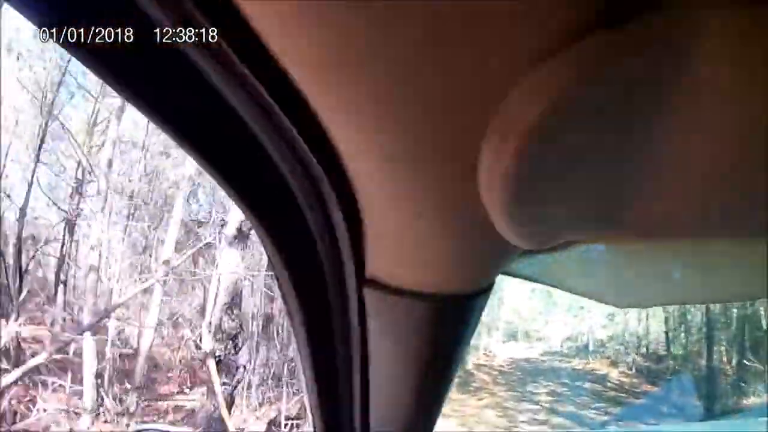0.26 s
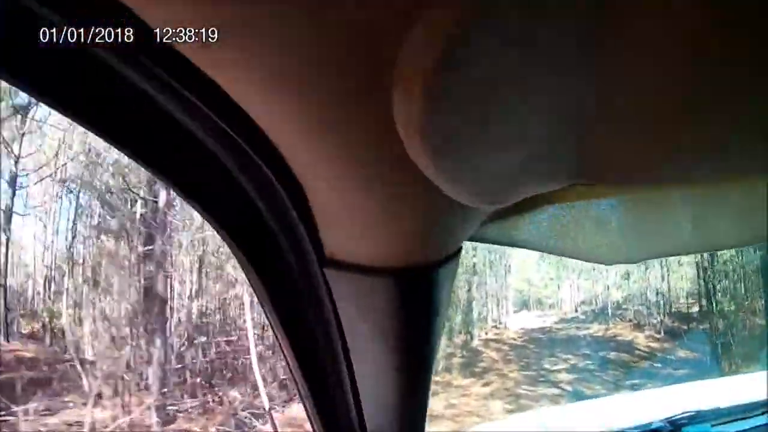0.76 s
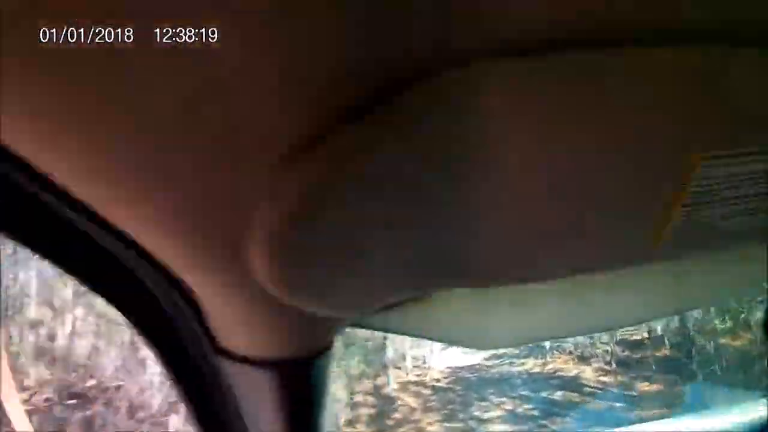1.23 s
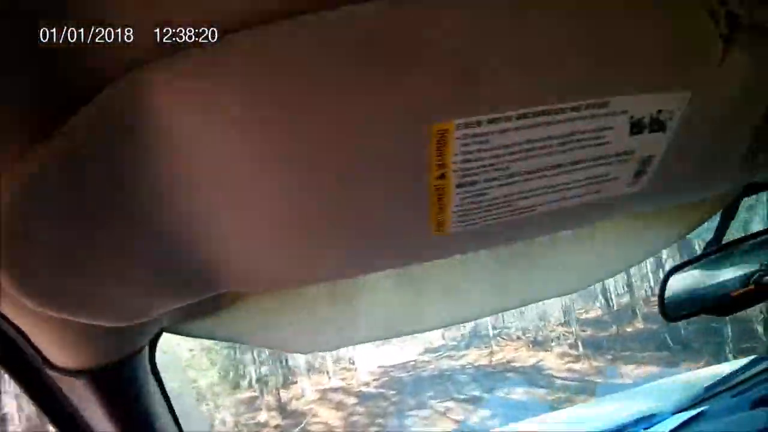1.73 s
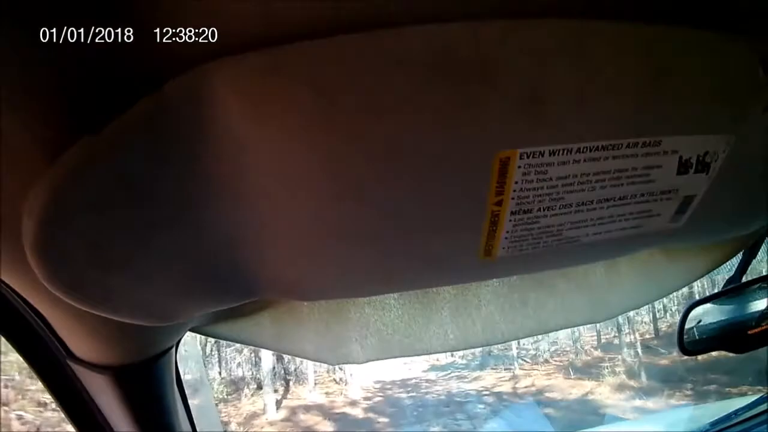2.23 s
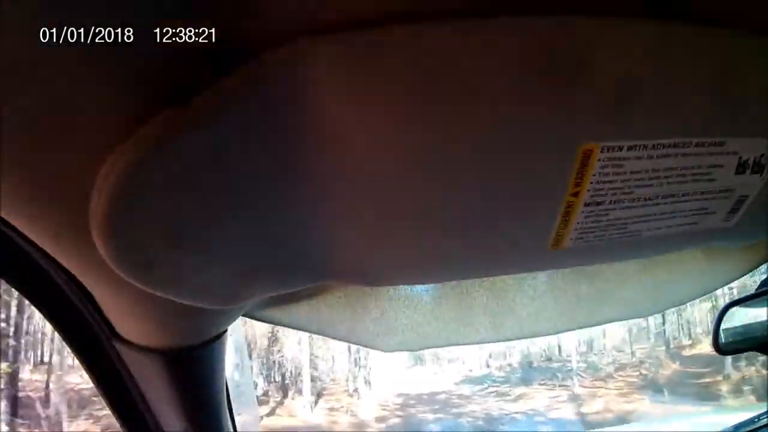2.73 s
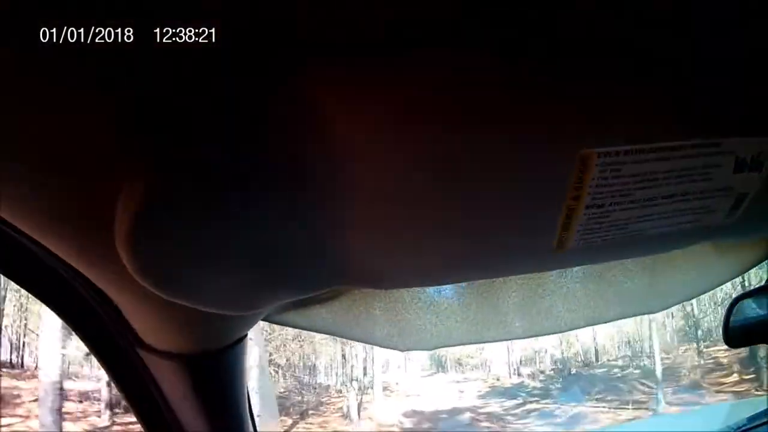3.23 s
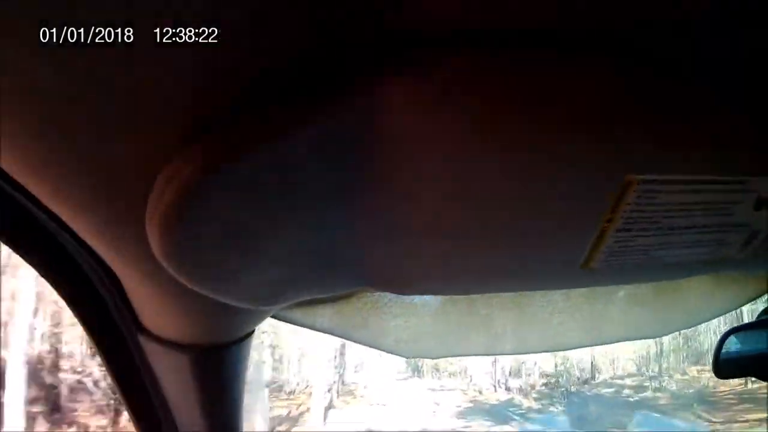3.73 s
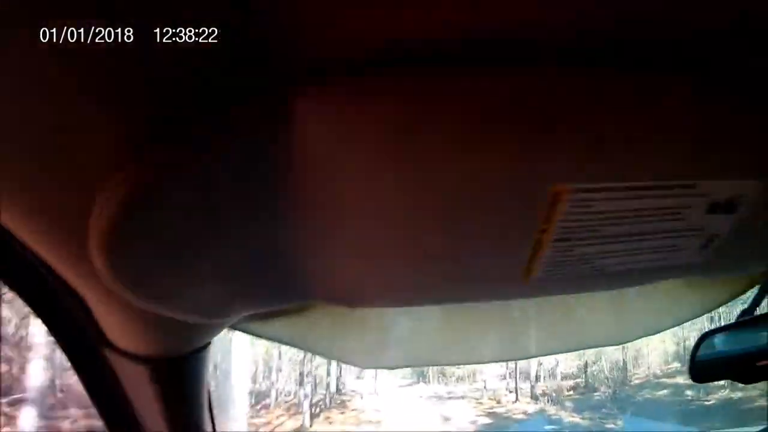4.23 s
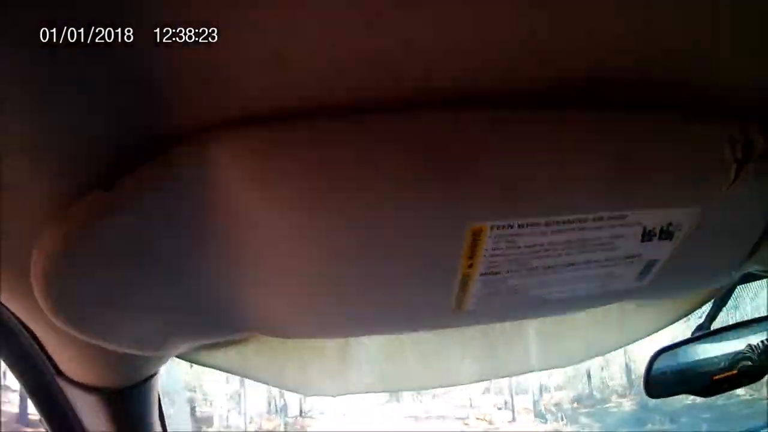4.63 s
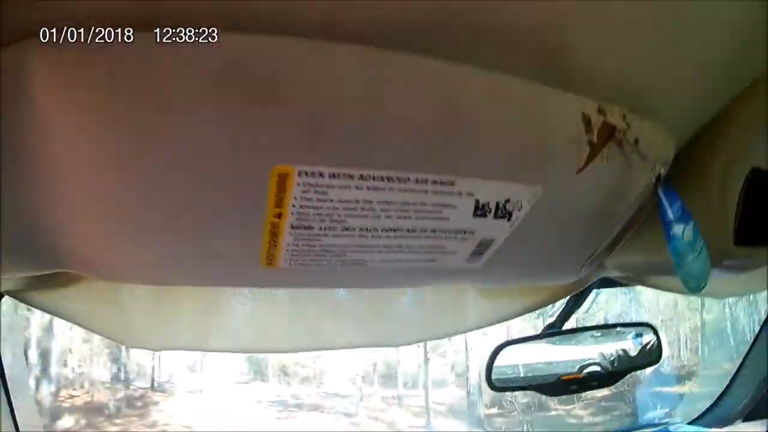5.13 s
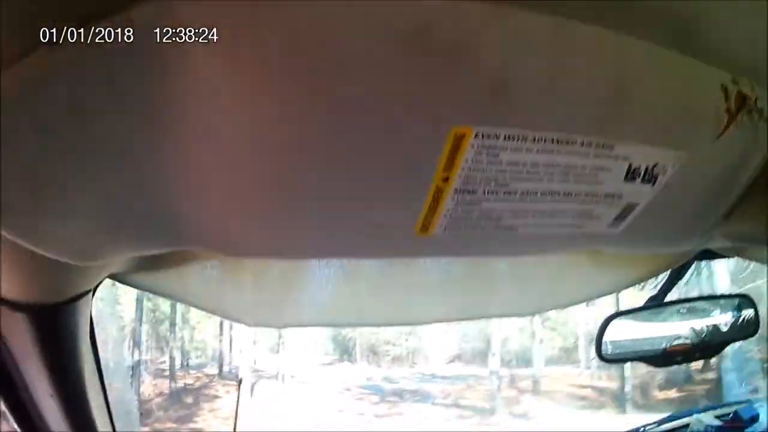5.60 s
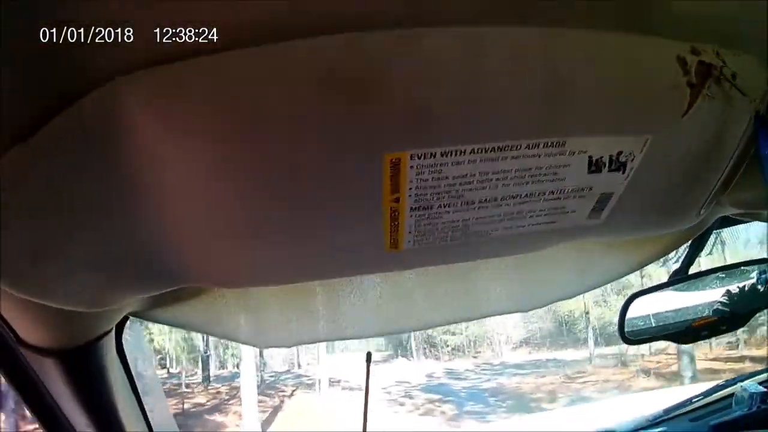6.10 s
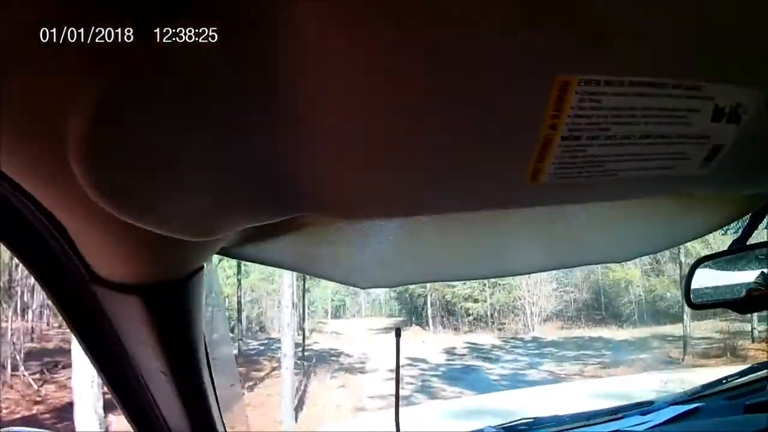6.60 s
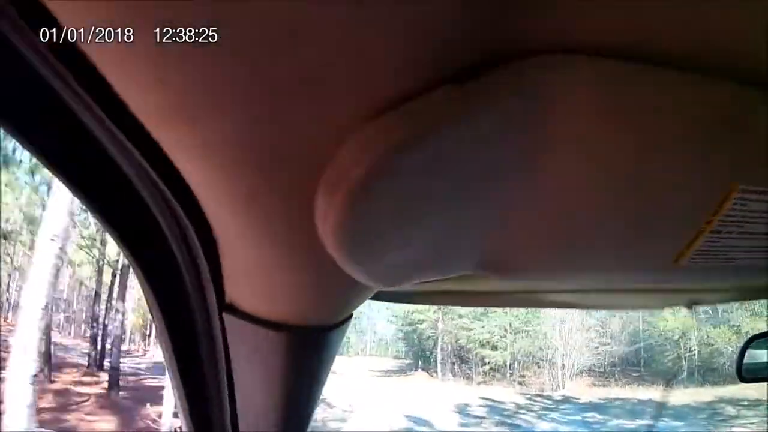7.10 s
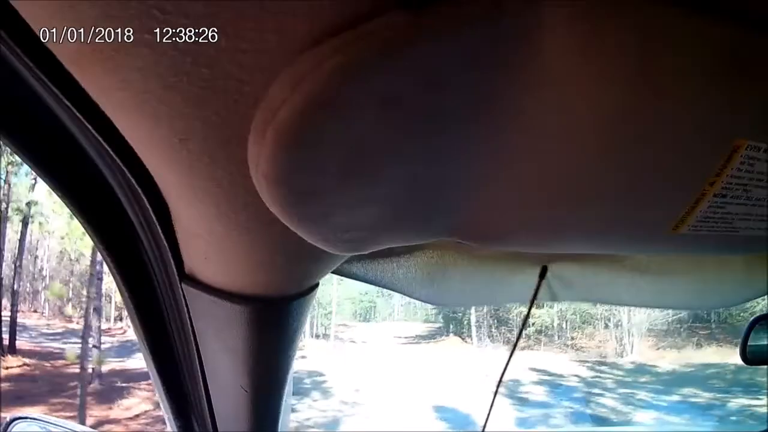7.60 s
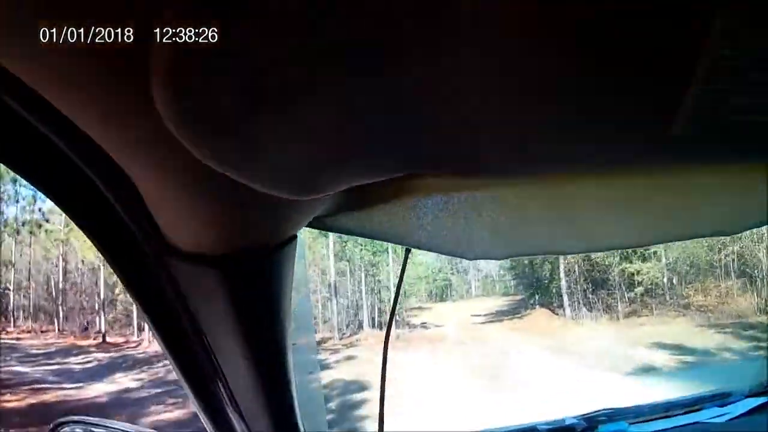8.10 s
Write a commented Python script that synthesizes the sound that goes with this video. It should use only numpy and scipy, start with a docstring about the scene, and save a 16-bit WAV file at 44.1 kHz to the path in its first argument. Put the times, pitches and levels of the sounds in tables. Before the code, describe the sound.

A truck drives slowly along a bumpy dirt road, heard from inside the cab. A deep, uneven exhaust drone runs throughout over low road rumble, light engine clatter, faint tyre grit and a barely audible brush of twigs. The engine pitch rises until about 2 seconds, then settles by 3. Small trim squeaks come around 2 and 3.8 seconds, along with soft, very low bumps. Loose trim begins knocking at about 4 seconds, and the bumps come closer together from 5. From about 6.3 seconds the driver lifts off and the engine sags to a lower, booming burble. Short floor thumps land between 6 and 8 seconds, strongest around 6.5, 7.1 and 7.5, amid busy hollow knocks and rattles. At about 8 seconds a half-second scrape passes under the body as the engine keeps running low.

```python
"""An eight-cylinder truck's exhaust drones through the cab as it creeps along a bumpy dirt road.
Two banks fire unevenly into their pipes; the note sags and booms when the driver lifts off.
Bumps thud through the springs and floor, loose trim knocks, rattles and squeaks, valve gear clatters.
Behind it sit road rumble, tyre grit, twigs brushing the body and one long scrape underneath."""
import sys
import numpy as np
from scipy import signal
from scipy.fft import rfft, irfft
from scipy.io import wavfile
from scipy.ndimage import uniform_filter1d

SR = 44100
rng = np.random.default_rng(int(sys.argv[2]) if len(sys.argv) > 2 else 0)


def unload_audio(sound):
    """Save the sound as a 16-bit wav file, at the path given as the first command line argument."""
    columns = np.transpose(np.atleast_2d(sound))
    # keep every value between -1 and 1, then stretch to whole-number steps
    steps = np.round(np.clip(columns, -1, 1) * 32767)
    wavfile.write(sys.argv[1], SR, steps.astype(np.int16))


N = 368235
TIME_S = np.arange(N) / SR


def gain_of(db):
    """Decibels to amplitude."""
    return 10 ** (np.asarray(db) / 20)


def unit_rms(x):
    """Normalises to an rms of one."""
    return x / np.sqrt(np.mean(x ** 2) + 1e-20)


def eq_db(curve, hz):
    """Reads an EQ curve on a log frequency axis."""
    freq_hz, level_db = np.transpose(curve)
    return np.interp(np.log(hz + 1), np.log(freq_hz + 1), level_db)


def automation(points):
    """Joins timed breakpoints into one value per sample."""
    return np.interp(TIME_S, *np.transpose(points))


def drift(size):
    """Random modulation of unit rms, smooth over size samples."""
    return unit_rms(uniform_filter1d(uniform_filter1d(rng.standard_normal(N), size), size))


def noise(curve, size, patchy_db):
    """Unit-rms noise within an EQ curve's band, with random patches in time and frequency."""
    hz = np.fft.rfftfreq(size, 1 / SR)
    real, imag, patches = rng.standard_normal((4 * N // size + 5, len(hz), 3)).T
    patches = unit_rms(uniform_filter1d(uniform_filter1d(patches, size=8, axis=0), size=6, axis=1))
    in_band = (hz >= curve[0][0]) & (hz <= curve[-1][0])
    spectrum = (real + 1j * imag) * gain_of(eq_db(curve, hz)[:, None] + patchy_db * patches)
    return unit_rms(signal.istft(spectrum * in_band[:, None], nperseg=size, noverlap=3 * size // 4)[1][:N])


def swells(rows):
    """Smooth rises and falls, one per row of start_s, length_s, peak_db."""
    return sum(gain_of(db) * np.sin(np.pi * np.clip((TIME_S - start_s) / length_s, 0, 1)) ** 2
               for start_s, length_s, db in rows)


# Tone of the twig swish: freq_hz, relative_db
TWIG_EQ = [(2900, -11), (3300, -5), (3900, -1.5), (4400, -6), (4900, -2.5), (5800, -4.5), (6200, -28.5)]
# Twigs brushing past: start_s, length_s, peak_db
TWIG_STROKES = [(.6, 0.8, -82.5), (2.1, 0.42, -76), (2.45, 0.76, -77), (6.55, 1.03, -77)]

def twigs():
    """Twigs drag along the body, swelling out of a faint constant swish."""
    level = (gain_of(-76) + swells(TWIG_STROKES)) * gain_of(1.3 * drift(size=600))
    return level * noise(TWIG_EQ, size=1024, patchy_db=4.5)


# Tone of the grit: freq_hz, relative_db
GRIT_EQ = [(800, -16), (1250, 3), (1700, -2.5), (2250, -11), (2500, -12), (2800, -12.5), (3100, -26),
           (3600, -44)]
# Fader on the grit: time_s, level_db
GRIT_LEVEL = [(0, -64), (2.498, -58), (5.801, -61.5), (6.798, -63), (8.35, -57)]

def tyre_grit():
    """Grit crunches under the tyres as a fluttering band of noise."""
    level_db = automation(GRIT_LEVEL) + 2.2 * drift(size=600)
    return gain_of(level_db) * noise(GRIT_EQ, size=512, patchy_db=3.0)


# Tone of the scrape: freq_hz, relative_db
SCRAPE_EQ = [(600, -26), (950, 6), (1250, 4), (1700, -4), (2250, -5), (2900, -17), (3300, -40)]

def scrape(start_s=7.93, length_s=0.47, peak_db=-45.5):
    """One long midrange scrape under the body."""
    return swells([(start_s, length_s, peak_db)]) * noise(SCRAPE_EQ, size=1024, patchy_db=3.5)


# Squeak cues: start_s, length_s, pitch_hz, level_db
TRIM_SQUEAKS = [(1.87, 0.07, 2850, -63), (1.885, 0.08, 1815, -55), (1.99, 0.03, 1870, -57),
                (2.03, 0.115, 1814, -55), (3.761, 0.014, 2090, -46), (3.763, 0.018, 1585, -54),
                (3.764, 0.027, 2660, -61)]

def squeaks():
    """Rubbing trim gives short, thin tones that waver a little."""
    out = np.zeros(N)
    for start_s, length_s, pitch_hz, level_db in TRIM_SQUEAKS:
        at, size = round(start_s * SR), round(length_s * SR)
        turns = np.cumsum(pitch_hz * (1 + 0.008 * drift(size=150)[:size])) / SR
        out[at:at + size] += gain_of(level_db) * np.sin(2 * np.pi * turns) * signal.windows.tukey(size, .5)
    return out


# Colour of the cab's air and panels, on both rumble and exhaust: freq_hz, gain_db
CAB_EQ = [(40, -6.5), (55, -4), (63, -0.5), (75, -0.4), (90, 0.5), (104, -4), (114, 4.5), (123, -2.5),
          (136, -4.5), (146, -0.5), (165, 1.5), (182, 6.5), (200, -5), (220, 4), (250, 7.5), (266, 0),
          (282, 9), (300, -4), (325, 8), (355, -0.5), (390, 7.5), (430, 2)]
# Tone of the road noise: freq_hz, relative_db
RUMBLE_EQ = [(25, -12.0), (40, 0.0), (55, -3.1), (75, -6), (100, -11.5), (130, -9.5), (160, -5),
             (190, -10.5), (215, -14), (250, -16.5), (300, -17), (350, -18.5), (400, -20), (460, -27.2),
             (650, -39), (900, -45.0)]

def road_rumble(load_db):
    """Road noise comes through the floor into the resonant cab, a little louder as the truck coasts."""
    hz = np.geomspace(RUMBLE_EQ[0][0], RUMBLE_EQ[-1][0], num=90)
    colour = np.c_[hz, eq_db(RUMBLE_EQ, hz) + eq_db(CAB_EQ, hz)]
    return gain_of(-34.5 - 0.1 * load_db) * noise(colour, size=4096, patchy_db=0.5)


# Tone of the valve gear: freq_hz, relative_db
CLATTER_EQ = [(290, -23.5), (500, 5), (637, -4.5), (836, -2.5), (953, -2), (1060, -7), (1150, -5.5),
              (1220, -0.5), (1340, -10), (1670, -22), (2070, -24.5), (2300, -34), (2860, -29), (4840, -120)]
# Firing order for clatter and exhaust, eight slots: bank (1 near, 0 far)
NEAR_BANK = np.array([1, 0, 0, 1, 0, 1, 1, 0])

def valve_clatter(cycle_hz, load_db, shake_db):
    """A noise puff at each firing, never two alike: stronger on the near bank, softer on a light load."""
    slot = 8 * np.cumsum(cycle_hz) / SR
    firing = slot.astype(int)
    accent = np.where(NEAR_BANK[firing % 8], 1.0, .45) * gain_of(1.8 * rng.standard_normal(N)[firing])
    pulses = uniform_filter1d(0.59 + accent * np.exp(-(slot % 1) / 4.4), size=60)
    clatter = unit_rms(noise(CLATTER_EQ, size=2048, patchy_db=2.5) * pulses)
    return gain_of(shake_db + 0.57 * load_db) * clatter


# Tone of the springs' unrest between bumps: freq_hz, relative_db
SPRING_EQ = [(12, -16.5), (20, -11), (27, 20.5), (38, 7), (48, -19.5), (70, -31)]
# Fader on that unrest: time_s, level_db
SPRING_LEVEL = [(0, -36), (3, -33), (6.5, -33), (7.6, -56), (8.35, -47)]
# Bump cues: peak_s, level_db, half_length_s
ROAD_BUMPS = [(1.977, -26.5, 0.18), (2.412, -38, 0.13), (3.117, -27, 0.22), (3.5, -25.5, 0.14),
              (4.264, -30, 0.17), (4.806, -30, 0.13), (5, -28.5, 0.19), (5.289, -26.5, 0.33),
              (5.495, -25, 0.21), (5.755, -28.5, 0.48), (6.028, -28, 0.12), (6.368, -20, 0.14),
              (6.698, -26, 0.46), (6.914, -26.5, 0.15), (7.261, -25.5, 0.14), (7.406, -29, 0.15),
              (8.084, -25, 0.12), (8.286, -25, 0.13)]

def springs(pitch_hz=29, spread=.08):
    """Each bump rings the springs for a few swings, over a bed of sub-bass unrest."""
    out = gain_of(automation(SPRING_LEVEL)) * noise(SPRING_EQ, size=8192, patchy_db=0.5)
    for peak_s, level_db, half_s in ROAD_BUMPS:
        detune, phase = rng.standard_normal(2)
        swing = np.sin(2 * np.pi * pitch_hz * (1 + spread * detune) * (TIME_S - peak_s) + np.pi * phase)
        out += np.sqrt(2) * swells([(peak_s - half_s, 2 * half_s, level_db)]) * swing
    return out


# Floor thump cues: start_s, level_db
WHEEL_DROPS = [(5.919, -23), (6.488, -17), (6.596, -20), (7.14, -17.5), (7.551, -18), (8.125, -23)]

def floor_thumps(pitch_hz=207.5, attack_s=0.0045, t60_s=0.081):
    """The floor pan booms briefly when a wheel drops."""
    out = np.zeros(N)
    for start_s, level_db in WHEEL_DROPS:
        t = np.maximum(TIME_S - start_s, 0)
        envelope = np.minimum(t / attack_s, 1) * gain_of(level_db - 60 * t / t60_s)
        out += envelope * np.sin(2 * np.pi * pitch_hz * t)
    return out


# Ring of the trim and the panel behind it: pitch_hz, relative_db, t60_s
TRIM_MODES = [(514, 1, 0.048), (708, -4.5, 0.06), (884, -8.5, 0.036), (1140, -10, 0.06), (1423, -10, 0.011),
              (1685, -8.5, 0.011), (2010, -7.5, 0.054), (2645, -13, 0.09), (3480, -13.5, 0.03),
              (3870, -14, 0.035), (5250, -15, 0.049)]
KNOCK_SAMPLES = 5000

def knock(clack_hz, clack_db, hollow_db, snap_db, hollow_hz=550, snap_hz=4100):
    """A blow cracks and rings the trim in three bands, with a buzzing tail and a weak rebound."""
    loose_piece = (clack_hz, -2, .07)  # one more mode, at the clack pitch
    hz, mode_db, t60_s = np.transpose(TRIM_MODES + [loose_piece])[:, :, None]
    scatter = rng.standard_normal((len(hz), 2, 1))
    t = np.arange(KNOCK_SAMPLES) / SR
    bands = (hollow_hz, hollow_db), (clack_hz, clack_db), (snap_hz, snap_db)

    def strength(at_hz):
        """The blow falls away with the squared distance in octaves from each band's centre."""
        return sum(gain_of(db - 15 * np.log2(at_hz / centre_hz) ** 2) for centre_hz, db in bands)

    bin_hz = np.fft.rfftfreq(len(t), 1 / SR) + 1
    crack_eq = strength(bin_hz) * np.sqrt(SR / bin_hz) / (1 + (bin_hz / 4700) ** 10)  # pink, top cut
    crack = irfft(rfft(rng.standard_normal(len(t))) * crack_eq) * gain_of(-11 - 60 * t / .075)
    wobble, buzz = uniform_filter1d(uniform_filter1d(rng.standard_normal((2, len(hz), len(t))), 90), 90)
    decay = gain_of(-60 * t / t60_s) + .28 * unit_rms(buzz) * gain_of(-60 * t / .14)
    level = strength(hz) * gain_of(mode_db + 1.8 * scatter[:, 0]) * decay
    phase = 2 * np.pi * hz * (1 + 0.04 * scatter[:, 1]) * t + .9 * unit_rms(wobble)
    attack = np.sin(np.pi / 2 * np.minimum(t / 0.0022, 1)) ** 2
    hit = ((level * np.sin(phase)).sum(0) + crack) * attack
    rebound = rng.uniform(0, .35) * np.roll(hit, round(rng.uniform(0.006, .02) * SR))
    return hit + rebound


# Knock cues: start_s, clack_hz, clack_db, hollow_db, snap_db
TRIM_KNOCKS = [(4.08, 930, -31.5, -47, -66), (4.115, 950, -37, -47, -66), (4.171, 960, -36, -55, -70),
               (4.206, 2890, -57, -46, -61), (4.314, 1930, -42, -54, -48), (4.338, 1660, -37.5, -49, -53),
               (4.836, 1310, -48.5, -33.5, -42), (5.04, 1520, -37, -41, -44.5),
               (5.153, 1190, -46, -33, -70), (5.247, 1290, -47, -29.5, -76),
               (5.318, 1180, -33.5, -47, -49.5), (5.351, 1840, -45.5, -33, -57),
               (5.919, 1960, -42, -26, -54.5), (6, 1720, -33.5, -38, -50), (6.129, 2080, -42, -52, -51.5),
               (6.341, 1410, -44.5, -40, -69), (6.442, 1100, -39, -37, -68),
               (6.488, 1680, -35.5, -25.5, -38.5), (6.558, 1300, -42, -32.5, -53),
               (6.599, 1440, -35, -25, -43), (6.642, 1320, -39, -28.5, -46), (6.658, 1504, -35.5, -51, -44),
               (6.782, 1300, -47, -33, -54), (6.861, 1480, -41, -31.5, -51), (7.091, 1000, -45, -37, -52),
               (7.133, 1050, -47, -35, -54), (7.161, 1900, -45, -39, -56), (7.19, 2340, -48, -30, -76),
               (7.296, 1200, -44, -32, -49), (7.472, 1790, -57, -37, -60), (7.553, 773, -38, -42, -66),
               (7.606, 1460, -40, -37, -41), (7.654, 1000, -42, -39, -48), (7.688, 1110, -36, -30, -47),
               (7.773, 1180, -37.5, -32, -66), (7.858, 1490, -33.5, -51, -47)]
# Density of small rattles: time_s, rattles_per_s
RATTLE_RATE = [(0, 14), (6.2, 25), (6.5, 70), (8.35, 60)]

def loose_trim(shake_db, variants=8):
    """Bumps knock the loose trim; small random rattles grow with the shaking of the body."""
    knocks = np.zeros(N + KNOCK_SAMPLES)
    for start_s, *blow in TRIM_KNOCKS:
        knocks[round(start_s * SR):][:KNOCK_SAMPLES] += knock(*blow)
    accent_db = 0.9 * np.minimum(rng.exponential(1, N), 4)
    taps = gain_of(shake_db + accent_db) * (rng.random(N) < automation(RATTLE_RATE) / SR)
    variant, rattles = rng.integers(0, variants, N), np.zeros(N)
    for k in range(variants):
        rattle = knock(rng.uniform(800, 2000), rng.uniform(-9.0, 0.81), hollow_db=1.5, snap_db=-30.5)
        rattles += signal.oaconvolve(taps * (variant == k), rattle)[:N]
    return knocks[:N] + gain_of(-5.5) * rattles


# Harmonics of the engine cycle, before cab colour and load: order, level_db
EXHAUST_ORDERS = [(5, -22.5), (7, -42), (8, -23), (9, -39), (10, -46), (11, -34), (12, -38), (13, -28),
                  (14, -35), (15, -43), (16, -31), (17, -45), (18, -49), (19, -49), (21, -49), (22, -50),
                  (23, -48), (24, -48), (26, -54), (27, -49), (28, -53), (29, -52), (30, -55), (31, -54),
                  (32, -54), (34, -54), (35, -56), (36, -57), (37, -56)]
# Each firing slot's place along its manifold: distance_ports
MANIFOLD_PLACE = np.array([0, 3, 1, 1, 2, 2, 3, 0])
# Cab resonances that turn the phase of passing orders: centre_hz, half_width_hz
CAB_RESONANCES = [(122, 9.8), (251, 14.5)]
# Fader on the orders above 20: time_s, gain_db
EXHAUST_BRIGHTNESS = [(0, 1), (1.1, 2.5), (1.5, 0), (2.2, 1), (2.6, 2.5), (6.3, -1.5)]
REV_CYCLE_HZ = 11.2  # above this speed the ports even out and the middle orders grow
FAR_BANK_GAIN, FAR_BANK_DELAY_S = .755, .0052
BOOM_ORDER = 16  # twice the firing rate

def exhaust_phase(order, cycle_hz):
    """An order's phase shifts with speed as eight puffs sum through the pipes and cross the cab."""
    speeds = np.linspace(cycle_hz.min(), cycle_hz.max(), num=200)
    hz = order * speeds
    db_per_port = -1.78 + 1.13 * np.maximum(speeds - REV_CYCLE_HZ, 0)[:, None]
    strength = np.where(NEAR_BANK, 1, FAR_BANK_GAIN) * gain_of(db_per_port * MANIFOLD_PLACE)
    lag_turns = order * np.arange(8) / 8 + hz[:, None] * FAR_BANK_DELAY_S * (1 - NEAR_BANK)
    puffs = (strength * np.exp(-2j * np.pi * lag_turns)).sum(1)
    cab_lag = sum(np.arctan((hz - centre) / half_width) for centre, half_width in CAB_RESONANCES)
    phase = np.unwrap(np.angle(puffs)) + .82 + 5.77e-5 * hz ** 2 - cab_lag
    return np.interp(cycle_hz, speeds, phase)


def exhaust(cycle_hz, load_db):
    """Each bank fires unevenly into its own pipe, so orders between the firing harmonics sound too."""
    turns, out = np.cumsum(cycle_hz) / SR, np.zeros(N)
    burble_db = np.minimum(2.5 - 0.66 * load_db, 2.5)  # odd orders stand out unless pulling hard
    boom_db = np.minimum(0.6 - 1.5 * load_db - 3 * (cycle_hz - 10.48), 9)  # grows when light and slow
    rev_db = 2 * np.maximum(cycle_hz - REV_CYCLE_HZ, 0)
    bright_db = automation(EXHAUST_BRIGHTNESS)
    for order, base_db in EXHAUST_ORDERS:
        waver_db = .045 * order * drift(size=6000)  # high orders feel each uneven firing
        level_db = base_db + eq_db(CAB_EQ, order * cycle_hz) + waver_db
        if order == EXHAUST_ORDERS[0][0]:
            level_db += np.minimum(load_db + 6, 0)  # the lowest order holds down to a load of -6 dB
        else:
            level_db += load_db if order <= BOOM_ORDER else np.minimum(load_db, -4.5)
            level_db += burble_db * (order % 2) + boom_db * (order == BOOM_ORDER)
            level_db += rev_db * (8 < order < 15) + bright_db * (order > 20)
        phase = 2 * np.pi * order * turns + exhaust_phase(order, cycle_hz)
        out += np.sqrt(2) * gain_of(level_db) * np.cos(phase)
    return out


# Engine speed, eight firings to a cycle: time_s, cycle_hz
ENGINE_SPEED = [(0, 10.18), (.75, 11.0), (1.2, 11.26), (1.9, 12.62), (2.1, 12.65), (2.45, 11.2),
                (2.8, 10.78), (4.15, 11.12), (4.65, 10.84), (5.3, 10.34), (5.75, 10.54), (6.3, 10.02),
                (6.65, 9.0), (6.95, 8.66), (7.25, 8.95), (7.65, 8.33), (8.1, 9.15), (8.35, 8.73)]
# How hard the engine pulls: time_s, load_db
ENGINE_LOAD = [(0, -2), (.75, -0.5), (1.648, -3.5), (2.4, -2), (3.603, 1.5), (4.648, -1), (5.549, -3.5),
               (6.4, -6.5), (6.58, -11.5), (6.901, -15), (7.249, -10.5), (7.6, -17), (8.1, -10),
               (8.35, -13)]
# Shaking of the body on the road: time_s, shake_db
BODY_SHAKE = [(0, -47.5), (0.698, -43), (1.599, -46.5), (2.802, -45), (3.798, -44), (4.398, -46.5),
              (5.999, -44.5), (6.499, -47.5), (7.2, -42.5), (7.8, -43.5), (8.35, -45.5)]

def scene():
    """The mono cab mix, ridden by engine speed, load and body shake."""
    cycle_hz, load_db, shake_db = map(automation, (ENGINE_SPEED, ENGINE_LOAD, BODY_SHAKE))
    mix = exhaust(cycle_hz, load_db) + springs() + floor_thumps() + road_rumble(load_db)
    mix += valve_clatter(cycle_hz, load_db, shake_db) + tyre_grit() + twigs() + scrape()
    return (mix + loose_trim(shake_db) + squeaks())[None]


# Tone of the treble hiss: freq_hz, relative_db
HISS_EQ = [(5500, -11.5), (6200, -0.5), (7300, -2), (7700, -4.5), (8300, 0.5), (15800, 0.5)]

def record(dry):
    """Adds a faint flickering hiss that rises with the loudness, a quick fade-in and a high cut."""
    loudness = np.sqrt(abs(uniform_filter1d(dry[0] ** 2, size=8000)) + 1e-12)
    flicker_db = 2.9 * drift(size=700)
    hiss = gain_of(-58.5 + flicker_db) * loudness ** 0.76 * noise(HISS_EQ, size=1024, patchy_db=3.5)
    fade_in = np.minimum(np.arange(N) / 200, 1)
    high_cut = signal.firwin(1023, cutoff=15780, window=("kaiser", 10), fs=SR)
    return signal.oaconvolve((dry + hiss) * fade_in, high_cut[None], "same")


dry = scene()
out = record(dry)
unload_audio(out)
```